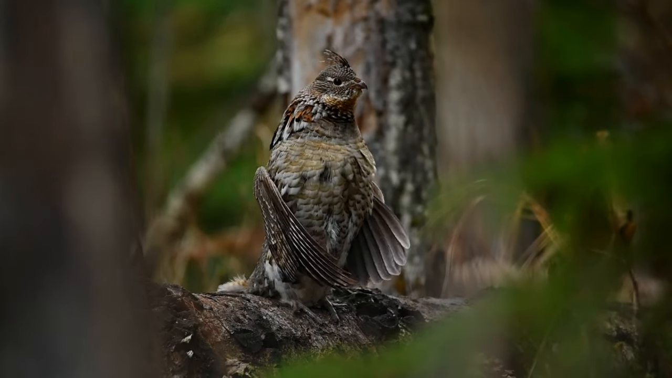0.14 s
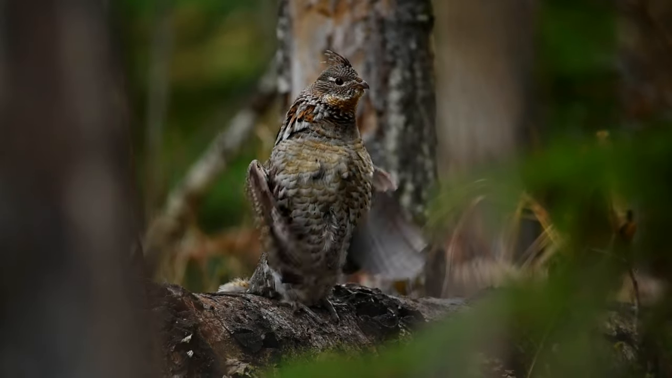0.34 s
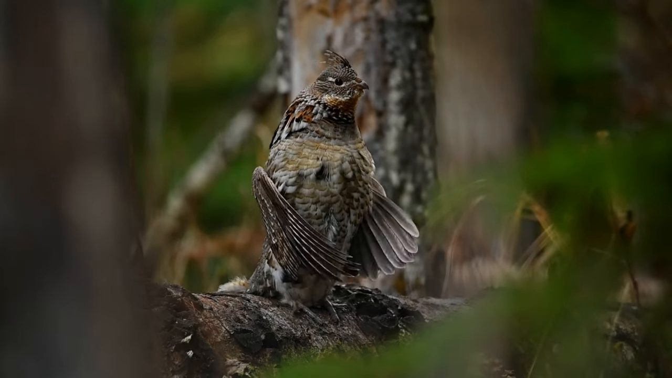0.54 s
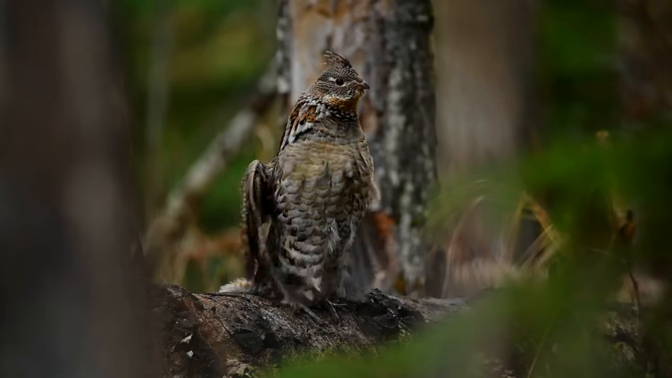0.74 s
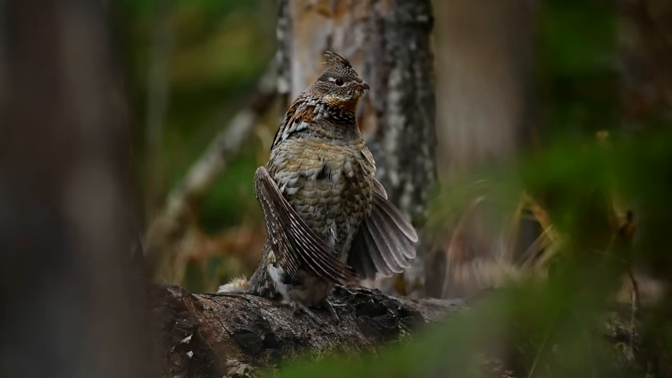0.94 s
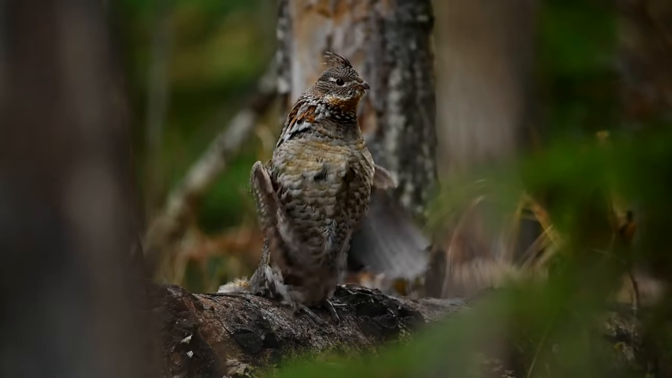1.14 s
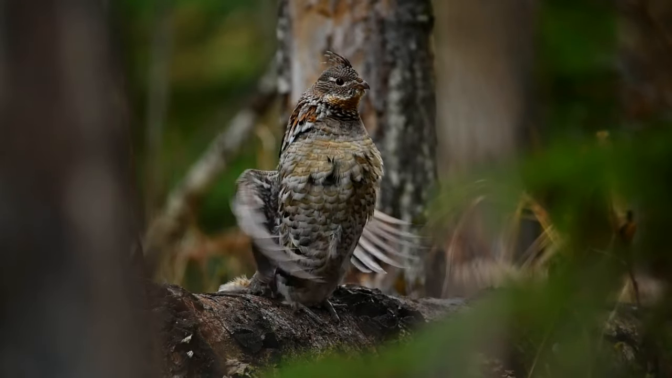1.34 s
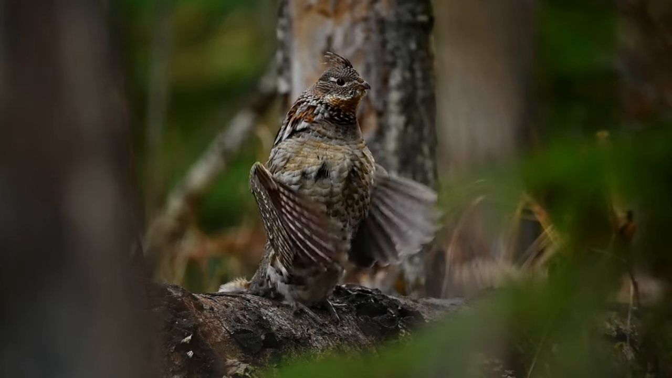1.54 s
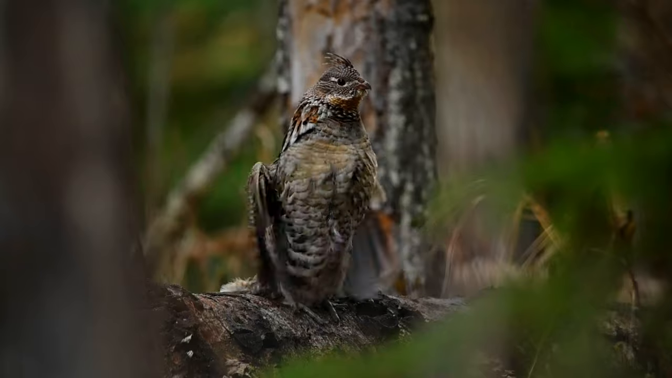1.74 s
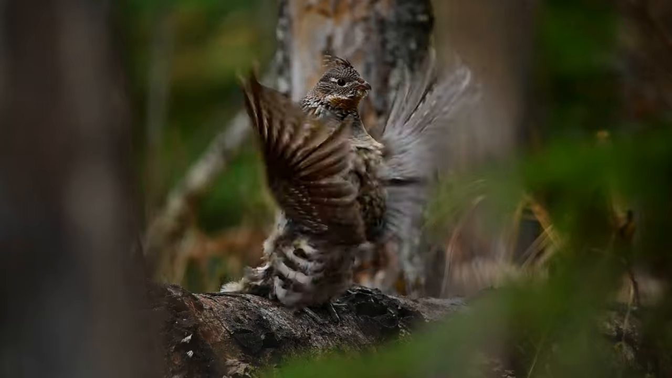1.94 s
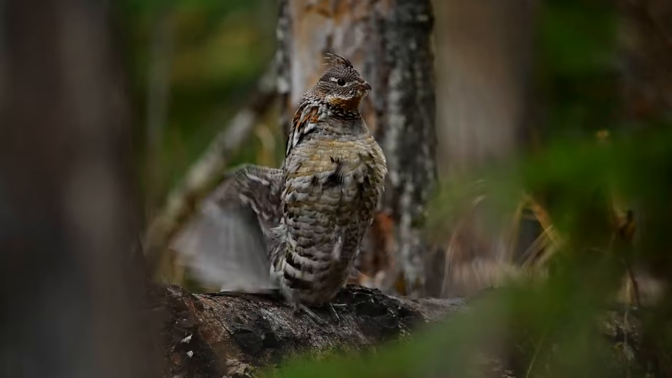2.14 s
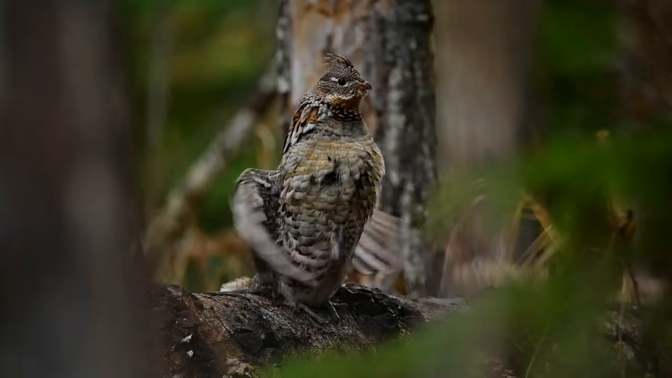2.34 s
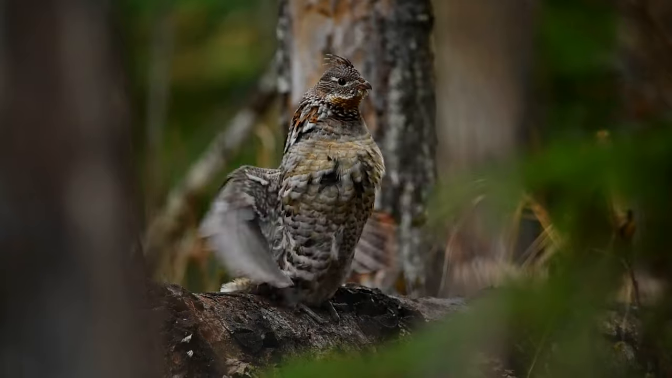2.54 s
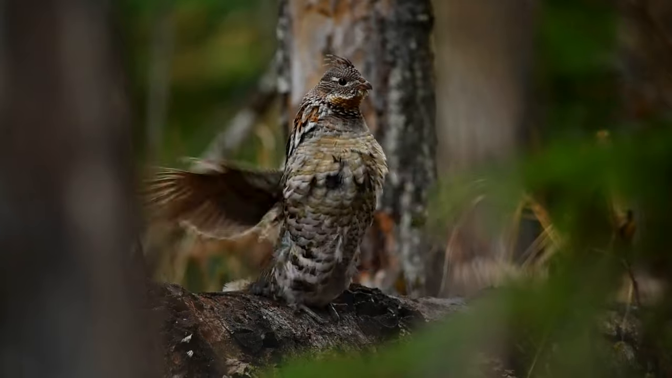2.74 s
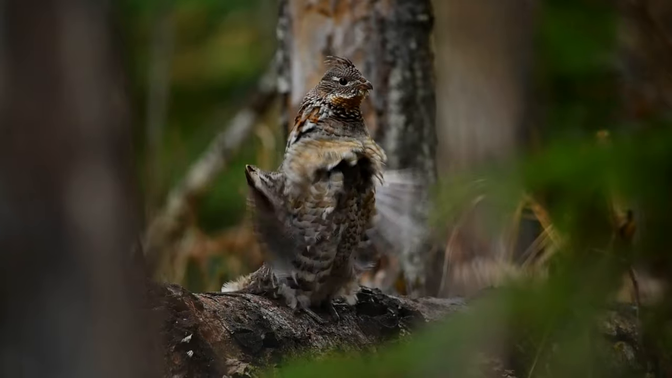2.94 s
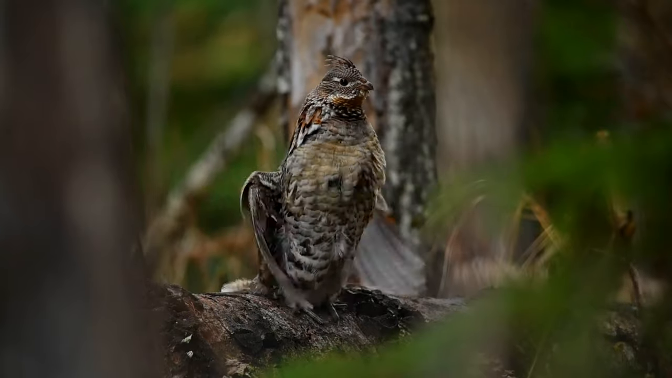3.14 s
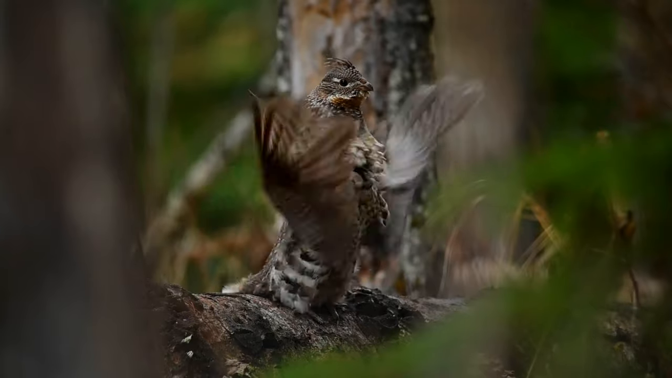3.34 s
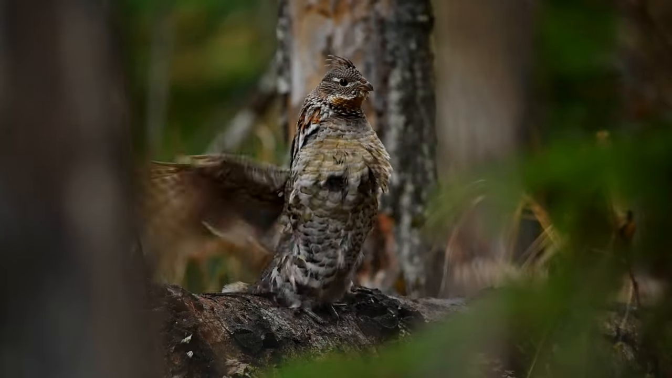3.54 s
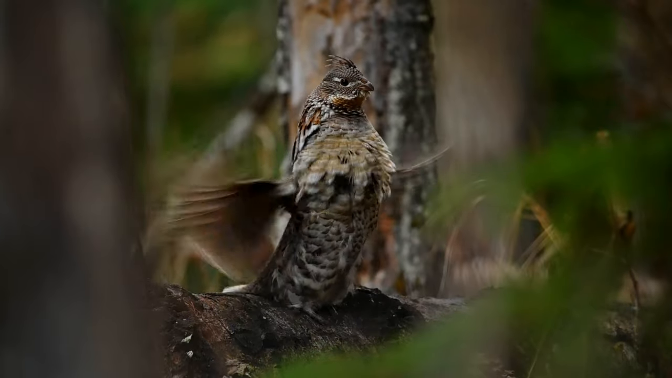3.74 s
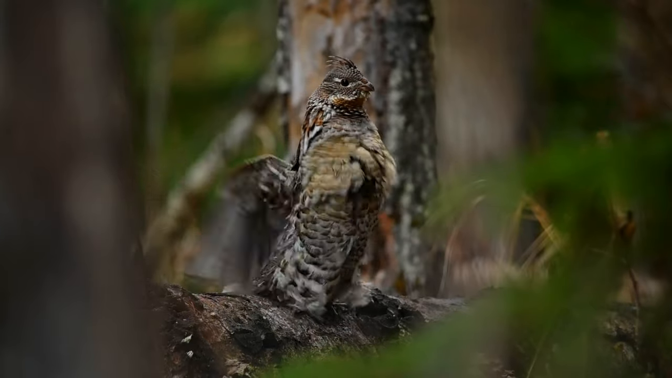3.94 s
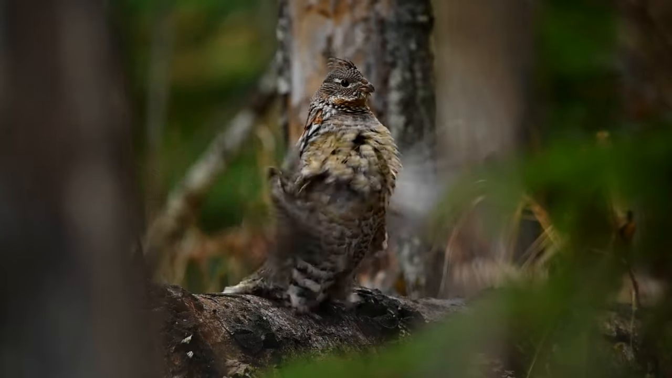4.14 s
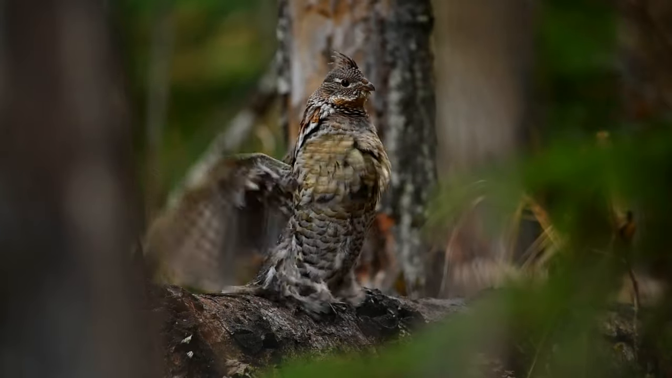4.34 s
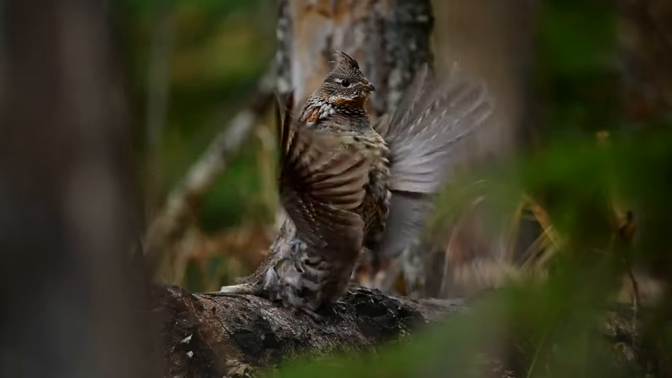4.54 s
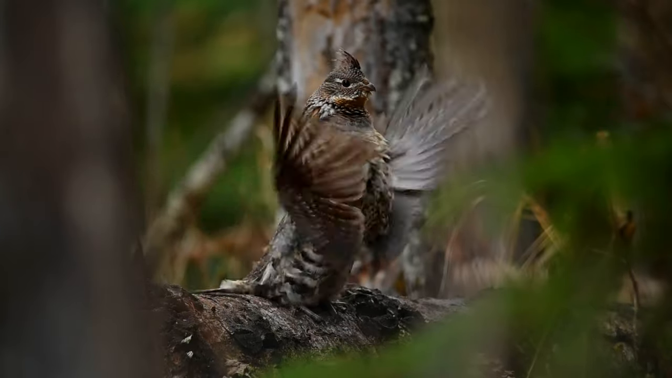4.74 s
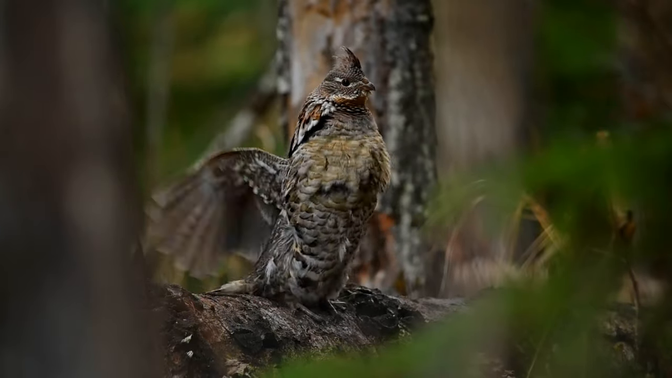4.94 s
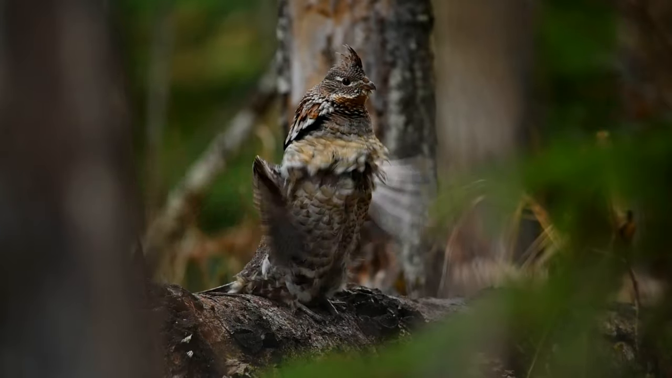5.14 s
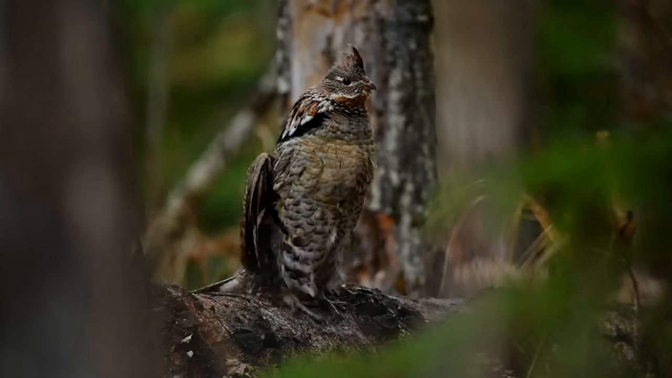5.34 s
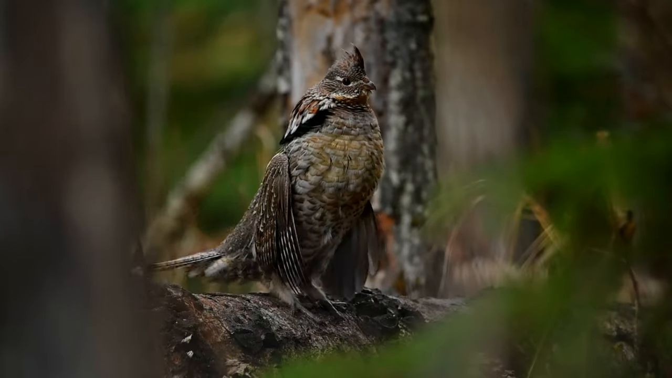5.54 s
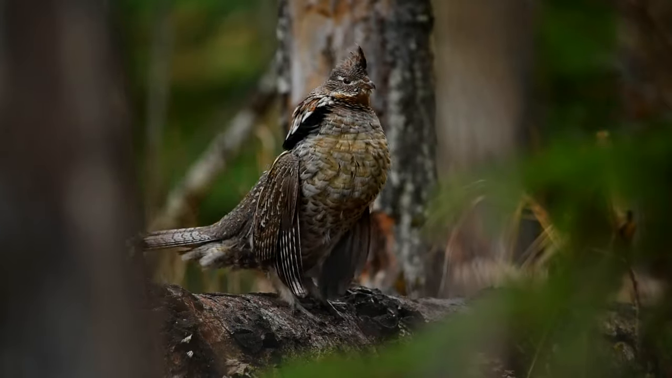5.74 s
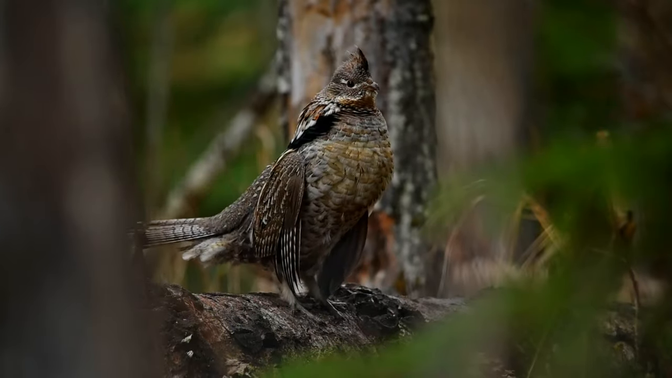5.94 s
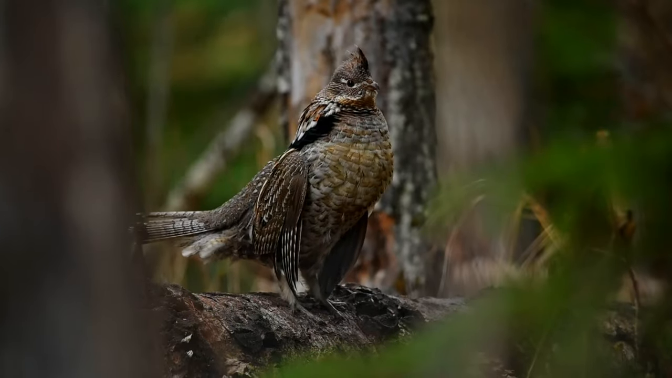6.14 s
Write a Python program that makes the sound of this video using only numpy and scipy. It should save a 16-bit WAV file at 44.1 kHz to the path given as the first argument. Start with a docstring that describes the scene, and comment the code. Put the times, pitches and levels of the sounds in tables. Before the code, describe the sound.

Very close on the left, muffled low wing thumps start far apart and steadily gather speed, their dull echoes lingering among trunks. They blur into a fluttering whir with dry feather ticks, then space out and fade. Faint high chirps dot the quiet wood, over low microphone rumble, soft hiss, faint wavering hums and distant traffic. After the last beat only this background and a barely audible plumage rustle remain.

```python
"""Grouse drumming on a log

A grouse drums beside the left microphone, slowly, then in a fast roll that slows again. Each wing stroke
is a deep high-passed puff of air with a swish of filtered noise; ground and trunks echo the thumps.
In the roll a fluttering rustle and snapping quills join in. Both microphones hear far road noise in three
swelling bands, two wavering sine hums and gliding bird whistles; each has its own rumble and hiss.
"""
import sys
import numpy as np
from scipy import signal
from scipy.fft import rfft, irfft
from scipy.io import wavfile
from scipy.ndimage import uniform_filter1d

SR = 44100
rng = np.random.default_rng(int(sys.argv[2]) if len(sys.argv) > 2 else 0)


def to_wav(s):
    """Save 16-bit WAV."""
    ch = np.atleast_2d(s).T  # columns
    pcm = np.round(np.clip(ch, -1, 1) * 32767)  # PCM
    wavfile.write(sys.argv[1], SR, pcm.astype(np.int16))


N = 273861
TIME = np.arange(N) / SR

# far road noise, before its swell: (frequency [Hz], density [dB per Hz])
ROAD_SPECTRUM = [(150, -105), (250, -94), (350, -98), (500, -98), (750, -92.5), (1000, -95), (1250, -101),
                 (1450, -110), (2200, -122), (4000, -130)]
# swell of the road: (time [s], deep part [dB], mid part [dB], upper part [dB])
ROAD_SWELL = [(0, -0.5, -1, -3.5), (.6, 5, 6, -5), (1.0, 0.5, 2.5, -3.5), (1.4, 0, -2, -3.5),
              (2.4, 3, 0, -3.5), (3.5, 6, 1.5, -2), (4.7, 5, 1.5, -3), (5.1, 6, 1, -3.5),
              (5.5, 2.5, 5.5, -3), (6.21, 6, 0.5, -1)]
# the two far hums, before their flutter: (time [s], level [dB])
LOW_HUM_LEVEL = [(0, -75), (1.2, -76.5), (1.7, -86), (2.5, -70), (2.7, -80), (2.85, -68), (3.3, -70),
                 (3.5, -77.5), (4.3, -77), (4.6, -72), (5.4, -68.5), (5.6, -81), (6.21, -86)]
HIGH_HUM_LEVEL = [(0, -87), (.25, -72), (1.1, -72), (1.25, -94), (1.9, -83), (2.1, -74), (2.4, -107),
                  (3.6, -81), (3.95, -72), (4.4, -74), (4.6, -87.5), (5.0, -74), (5.4, -94), (5.8, -83),
                  (6.21, -70.5)]
# each microphone's own noise, before its rumble swells: (frequency [Hz], density [dB per Hz])
LEFT_SPECTRUM = [(25, -100), (40, -79), (60, -79), (80, -61.5), (120, -78), (160, -70.5), (220, -84),
                 (350, -96), (700, -108), (1400, -108), (2400, -112), (5600, -107), (11000, -110),
                 (16000, -112)]
RIGHT_SPECTRUM = [(20, -98), (40, -85), (60, -79), (85, -79), (120, -85), (160, -89), (220, -94),
                  (350, -104), (700, -110), (1400, -115), (2400, -116), (5600, -114), (11000, -117),
                  (16000, -116)]
# small birds: (time [s], length [s], first pitch [Hz], last pitch [Hz], roughness [share of pitch],
# level before panning [dB], echo against the note [dB], left minus right [dB])
CHIRPS = [(0.1, 0.042, 2950, 2780, .01, -85, -3, 19), (0.245, .03, 2800, 2750, .01, -87, 2, 12),
          (0.524, 0.034, 2930, 2970, .01, -83, -1, 15), (0.588, 0.023, 2560, 2550, .01, -85.5, 3, 11),
          (.665, 0.032, 2520, 2450, .01, -81, -4, 10), (0.693, 0.027, 6750, 7030, 0.029, -71, 6, -2),
          (0.727, 0.046, 6770, 7100, 0.034, -69, 2, 0), (0.944, 0.038, 7070, 8200, .004, -58, -5.5, 0),
          (2.114, 0.024, 6640, 7700, 0.0052, -68, 0, -3), (2.251, 0.022, 6750, 7770, .006, -70.5, 14.5, 1),
          (2.805, .025, 6600, 7500, .017, -74, 9, 4), (3.034, .025, 6570, 7460, 0.0085, -61, 2, 2),
          (3.061, 0.019, 7100, 7860, 0.019, -60, -3, -5), (3.203, 0.063, 6800, 7030, .016, -65.5, -1, 1),
          (3.626, 0.04, 7330, 7730, .014, -59.5, -8, -2.5)]
# wing strokes: (time [s], thump peak before echoes [dB])
BEATS = [(0.3415, -9.5), (0.7628, -9), (1.134, -9.5), (1.461, -9.5), (1.7518, -9.5), (2.014, -10),
         (2.2502, -10.5), (2.462, -10.5), (2.6557, -10.5), (2.833, -10.5), (2.9961, -10.5), (3.1467, -11),
         (3.284, -12.5), (3.4112, -13.5), (3.5296, -12), (3.639, -12), (3.738, -13), (3.8285, -14.5),
         (3.9111, -16.5), (3.9857, -17), (4.0545, -15.5), (4.1159, -14.5), (4.1649, -16.5), (4.2104, -15.5),
         (4.2618, -16.5), (4.317, -15), (4.3806, -16.5), (4.45, -17), (4.529, -16), (4.6158, -17),
         (4.7111, -15.5), (4.8159, -17), (4.9299, -18), (5.0566, -19), (5.1956, -19), (5.3574, -22.5)]
# tone of the swishes: (frequency [Hz], weight [dB])
SWISH_SPECTRUM = [(760, -13), (1300, -4), (1770, -6.5), (2420, -14.5), (3010, -8.5), (4030, 0), (4420, -1),
                  (5490, 3.5), (8320, -3), (15500, -23)]
# tone of the whirring rustle and the snaps: (frequency [Hz], weight [dB])
RUSTLE_SPECTRUM = [(760, -25), (1300, -7), (1770, -8.5), (2420, -15.5), (3040, -7.5), (5490, -2),
                   (8230, -3.5), (15500, -23)]
# the loudest quill snaps: (time [s], noise burst before its tone filter [dB])
SNAPS = [(3.628, -37), (3.6817, -32), (3.7464, -34), (3.864, -38), (3.9945, -40), (4.0253, -35),
         (4.078, -38), (4.088, -29), (4.1424, -32), (4.1895, -30.5), (4.228, -29), (4.236, -32),
         (4.282, -25), (4.288, -37), (4.4833, -30), (4.487, -34), (4.5196, -40), (4.604, -40.5),
         (4.6873, -44)]
# shape of the strokes: (time [s], length of the air push [ms], limit below which the wing radiates badly [Hz])
PUSH = [(.3, 2.73, 129), (2.8, 2.785, 121.7), (3.4, 3.14, 139), (3.9, 2.72, 109.5), (4.4, 2.93, 119),
        (4.6, 3.38, 184), (5.4, 3.16, 174)]
# return strokes that push air too at top speed: (time [s], thump peak before echoes [dB])
RETURNS = [(4.015, -31.5), (4.086, -33), (4.154, -22.5), (4.189, -26), (4.201, -23.5), (4.25, -21.5),
           (4.295, -36)]
# far wing, ground and trunks: (delay [ms], level against the thump [dB])
ECHOES = [(4.6, -8.9), (12.1, -13.2), (17.9, -24), (30.6, -24.4), (41.6, -21.7), (55.4, -30.5),
          (87.4, -30.8), (98.9, -28), (110, -30.8)]

LOW_HUM_HZ, HIGH_HUM_HZ = 437, 590.5
LEFT_RUMBLE_DB, RIGHT_RUMBLE_DB, RIGHT_SWELL_DB = 0.85, -0.3, 1.5
WAKE_DB = 4  # extra left rumble when the smoothed beat rate equals FAST_PER_S
CHIRP_T60_S, CHIRP_GLIDE_S = 0.36, 0.0212  # echo decay; time a glide takes to level off
FAST_PER_S = 20  # beat rate at which the whir and small snap levels are given
SWISH_DB, SWISH_SLOPE = -49.5, 0.67  # first stroke; dB of swish for each dB of thump
BLUR_PER_S, BLUR_DB_PER_BEAT = 12, -0.42  # above this beat rate the single swishes melt into the whir
SWISH_LEAD_MS, SWISH_RISE_MS, SWISH_FALL_MS = 14.5, 2.8, 17.3
SWISH_TAIL_DB, SWISH_TAIL_MS = -15, 58
PATCHY_DB = 1.4  # wander of each third-octave band in the swish
OPEN_LEAD_MS, OPEN_MS, OPEN_DB = 27, 16.4, -12.5  # a soft rustle as the wings open, against the swish
WHIR_DB, WHIR_DB_PER_BEAT = -52, 1.5  # level at FAST_PER_S; change per beat a second
WHIR_SMOOTH_S, WHIR_LAG_S = 0.15, 0.02  # the rustle trails the beat rate
SETTLE_S, SETTLE_RISE_S, SETTLE_DB = 5.4, 0.5, -81  # a faint rustle as the plumage settles
SNAP_MS, SNAP_TOP_HZ = 0.5, 11000
SMALL_SNAPS_PER_S, SMALL_SNAP_DB, SMALL_SNAP_DB_PER_BEAT = 14, -42, 0.5  # count and level at FAST_PER_S
RETURN_MS, RETURN_HZ = 2.38, 151  # air push and radiation limit of the return strokes
WOOD_DB, WOOD_T60_S = -21, 1.4  # scattered bass that stays among the trees
THUMP_LOW_CUT_HZ = 29
FAR_MIC_DB = -42  # the thumps barely reach the right microphone
TOP_HZ = 15850


def undb(db):
    """Turns decibels into a gain."""
    return 10 ** (np.asarray(db) / 20)


def curve(table, column):
    """Draws a straight-line envelope through one column of a table whose first column is time."""
    rows = np.array(table)
    return np.interp(TIME, rows[:, 0], rows[:, column])


def colour(x, spectrum):
    """Weights a sound by (frequency [Hz], weight [dB]) points, joined on a log frequency scale."""
    hz, db = np.transpose(spectrum)
    log_hz = np.log(np.arange(N // 2 + 1) * SR / N + 1)
    weight = undb(np.interp(log_hz, np.log(hz), db))
    return irfft(rfft(x) * weight, N)


def noise(spectrum):
    """Gaussian noise with the given dB per Hz."""
    return colour(rng.standard_normal(N), spectrum) * np.sqrt(SR / 2)


def low(x, hz):
    """Low-passes forwards and backwards, so nothing shifts in time."""
    return signal.sosfiltfilt(signal.butter(3, hz, fs=SR, output="sos"), x)


def high_pass(x, order, hz):
    """Butterworth high-pass."""
    return signal.sosfilt(signal.butter(order, hz, "high", fs=SR, output="sos"), x)


def wander(rate):
    """Random levels, a new one every 1 / rate s, slewed from one to the next; spread near 1."""
    hold = int(SR / rate)
    steps = np.repeat(rng.standard_normal(N // hold + 1), hold)
    return 1.086 * uniform_filter1d(steps, hold)[:N]


def ticks(seconds, sizes):
    """Single-sample impulses of given sizes."""
    out = np.zeros(N)
    out[np.round(np.asarray(seconds) * SR).astype(int)] = sizes
    return out


def trees(x, t60, rise):
    """Dense scatter from many trunks: a decaying noise tail of unit energy."""
    age = np.arange(int(t60 * SR)) / SR
    fade = undb(-60 * age / t60) * np.clip(age / rise, 0, 1)
    tail = rng.standard_normal(len(age)) * fade
    return signal.fftconvolve(x, tail / np.sqrt(np.sum(tail ** 2)))[:N]


def road():
    """Far traffic: noise split into deep, mid and upper parts that swell on their own."""
    x = noise(ROAD_SPECTRUM)
    below_480, below_800 = low(x, 480), low(x, 800)
    parts = below_480, below_800 - below_480, x - below_800
    out = np.zeros(N)
    for column, part in enumerate(parts, start=1):
        out += part * undb(curve(ROAD_SWELL, column) + 0.9 * wander(12))
    return out


def hum(hz, table):
    """A far sine that wavers in pitch and flutters in level on its way through the air."""
    phase = 2 * np.pi * np.cumsum(hz + 1.3 * wander(5)) / SR
    level = undb(curve(table, 1) + 1.46 * wander(10))
    return np.sqrt(2) * level * np.sin(phase)


def microphone_noise(spectrum, swell_db):
    """One microphone's own noise: the rumble below 220 Hz swells and gusts, the hiss stays smooth."""
    x = noise(spectrum)
    rumble_gain = undb(swell_db + 0.54 * wander(8.4))
    return x + low(x, 220) * (rumble_gain - 1)


def birds():
    """Thin whistles, some rough in pitch, that glide fast and level off, smeared by the trees."""
    out, warble = np.zeros((2, N)), wander(500)
    for s, length, first_hz, last_hz, rough, db, echo_db, pan_db in CHIRPS:
        part = np.arange(int(length * SR)) / (length * SR)
        start = int(s * SR)
        stop = start + len(part)
        glide = np.clip(1 - part * length / CHIRP_GLIDE_S, 0, 1) ** 2
        hz = last_hz + (first_hz - last_hz) * glide
        hz = hz * (1 + rough * warble[start:stop])
        envelope = np.sin(np.pi * part) ** 0.21
        note = np.zeros(N)
        note[start:stop] = undb(db) * envelope * np.sin(2 * np.pi * np.cumsum(hz) / SR)
        # each side gets its own scatter
        heard = [note + undb(echo_db) * trees(note, CHIRP_T60_S, rise=0.041) for _ in range(2)]
        out += heard * undb([[pan_db / 2], [-pan_db / 2]])
    return out


def beat_rate():
    """Strokes a second, from the gaps between them."""
    s = np.array(BEATS)[:, 0]
    return np.interp(TIME, (s[1:] + s[:-1]) / 2, 1 / np.diff(s), right=0)


def patchy(x):
    """Gives noise a shifting colour: bands about a third-octave wide wander in level on their own."""
    spectrum = rfft(x)
    # the 1000 Hz offset makes the low bands wider
    band = np.round(3 * np.log2(np.arange(N // 2 + 1) * SR / N + 1000))
    out = np.zeros(N)
    for k in np.unique(band):
        out += irfft(spectrum * (band == k), N) * undb(PATCHY_DB * wander(12))
    return out


def swishes(rate):
    """Air hisses through the quills from just before each thump, after a soft rustle of opening wings."""
    s, thump_db = np.transpose(BEATS)
    blur = np.maximum(rate[(s * SR).astype(int)] - BLUR_PER_S, 0)
    db = SWISH_DB + SWISH_SLOPE * (thump_db - thump_db[0]) + BLUR_DB_PER_BEAT * blur
    ms = 1000 * TIME[:SR // 2]
    rise = 1 - np.exp(-(ms / SWISH_RISE_MS) ** 2)
    fall = np.exp(-ms / SWISH_FALL_MS) + undb(SWISH_TAIL_DB) * np.exp(-ms / SWISH_TAIL_MS)
    shape = rise * fall
    swish = signal.fftconvolve(ticks(s - SWISH_LEAD_MS / 1000, undb(db)), shape / shape.max())[:N]
    bump = np.sin(np.pi * np.clip(ms / OPEN_MS, 0, 1))
    opening = signal.fftconvolve(ticks(s - OPEN_LEAD_MS / 1000, undb(db + OPEN_DB)), bump)[:N]
    hiss = patchy(noise(SWISH_SPECTRUM))
    uneven = undb(2.0 * wander(300))  # single feathers catch the air unevenly
    return (swish + opening) * uneven * hiss / hiss.std()


def whir(rate):
    """A fluttering noise rustle that follows the beat rate, then a faint one as the plumage settles."""
    smooth_rate = uniform_filter1d(rate, int(WHIR_SMOOTH_S * SR))
    trailing = np.roll(smooth_rate, int(WHIR_LAG_S * SR))
    level = undb(WHIR_DB + WHIR_DB_PER_BEAT * (trailing - FAST_PER_S) + 3.5 * wander(200))
    settling = undb(SETTLE_DB) * np.clip((TIME - SETTLE_S) / SETTLE_RISE_S, 0, 1)
    rustle = noise(RUSTLE_SPECTRUM)
    return (level + settling) * rustle / rustle.std()


def quill_snaps(rate):
    """Short decaying noise bursts: the loudest at set times, weaker ones by chance while the beat is quick."""
    s, peak_db = np.transpose(SNAPS)
    chance = SMALL_SNAPS_PER_S / SR * rate / FAST_PER_S * (rate > 7)
    small_db = SMALL_SNAP_DB + SMALL_SNAP_DB_PER_BEAT * (rate - FAST_PER_S) + 1.9 * rng.standard_normal(N)
    small = (rng.random(N) < chance) * undb(small_db)
    crack = np.exp(-1000 * TIME[:SR // 2] / SNAP_MS)
    envelope = signal.fftconvolve(ticks(s, undb(peak_db)) + small, crack)[:N]
    burst = envelope * np.sign(rng.standard_normal(N))
    return low(colour(burst, RUSTLE_SPECTRUM), SNAP_TOP_HZ)


def thumps():
    """A smooth push of air of which only the quick part radiates, then echoes and woodland scatter."""
    out, age = np.zeros(N), np.arange(-1000, 4000) / SR
    push_ms, radiate_hz = curve(PUSH, 1), curve(PUSH, 2)
    strokes = [(s, db, push_ms[int(s * SR)], radiate_hz[int(s * SR)]) for s, db in BEATS]
    strokes += [(s, db, RETURN_MS, RETURN_HZ) for s, db in RETURNS]
    for s, db, ms, hz in strokes:
        push = -np.exp(-0.5 * (1000 * age / ms) ** 2)
        puff = high_pass(push, 4, hz)
        start = int((s + age[0]) * SR)
        out[start:start + len(age)] += undb(db) * puff / np.abs(puff).max()
    echoes = sum(undb(db) * np.roll(out, int(ms * SR / 1000)) for ms, db in ECHOES)
    scatter = undb(WOOD_DB) * trees(out, WOOD_T60_S, rise=0.0097)
    return high_pass(out + echoes + scatter, 2, THUMP_LOW_CUT_HZ)


def scene():
    """Sets the bird at the left microphone, with the far sounds and small birds in both."""
    far = road() + hum(LOW_HUM_HZ, LOW_HUM_LEVEL) + hum(HIGH_HUM_HZ, HIGH_HUM_LEVEL)
    rate = beat_rate()
    # the rumble at the near microphone swells with the beat rate
    wake_db = WAKE_DB * uniform_filter1d(rate, SR // 4) / FAST_PER_S
    left_noise = microphone_noise(LEFT_SPECTRUM, LEFT_RUMBLE_DB + wake_db)
    right_noise = microphone_noise(RIGHT_SPECTRUM, RIGHT_RUMBLE_DB + RIGHT_SWELL_DB * wander(2.32))
    whistles = birds()
    feathers = swishes(rate) + whir(rate) + quill_snaps(rate)
    drum = thumps()
    left = drum + feathers + left_noise
    right = undb(FAR_MIC_DB) * drum + right_noise
    return np.array([left, right]) + far + whistles


def record(dry):
    """The recorder cuts the top with a steep elliptic low-pass."""
    return signal.sosfilt(signal.ellip(14, 0.2, 60, TOP_HZ, fs=SR, output="sos"), dry)


dry = scene()
out = record(dry)
to_wav(out)
```